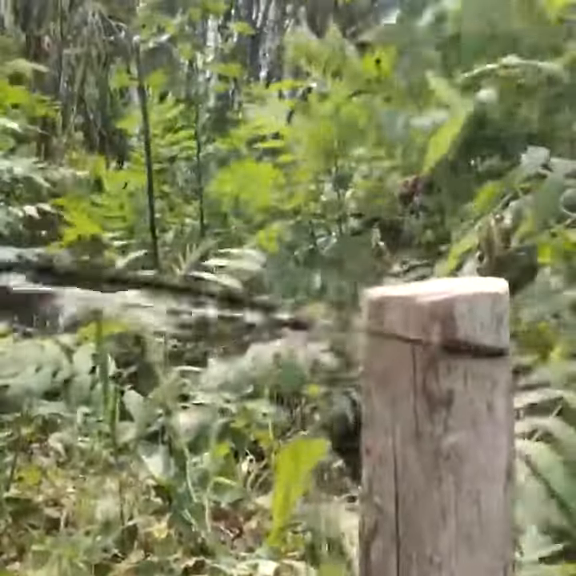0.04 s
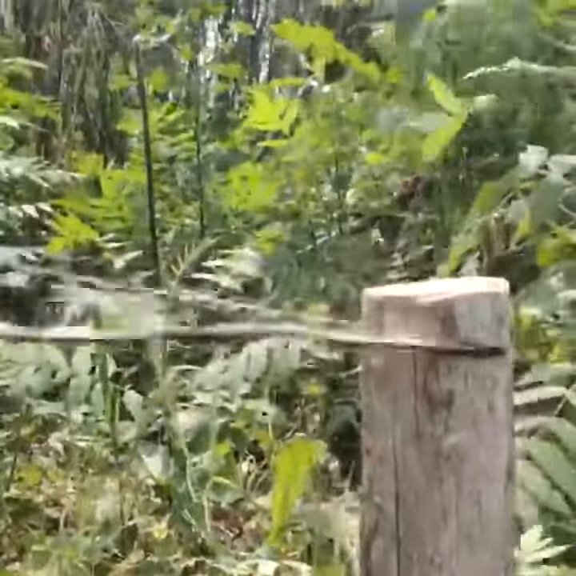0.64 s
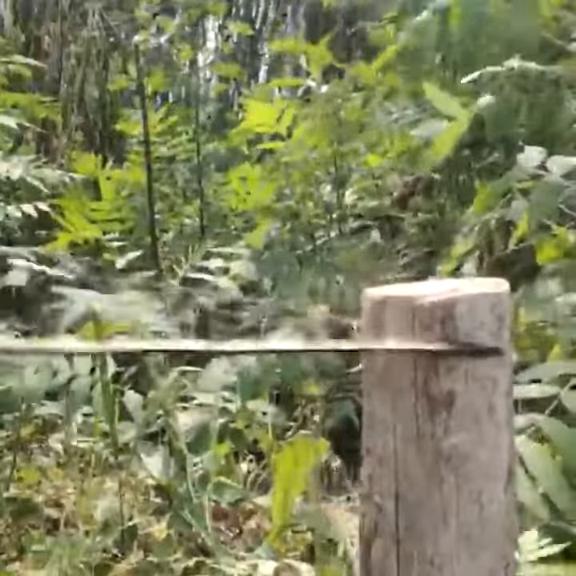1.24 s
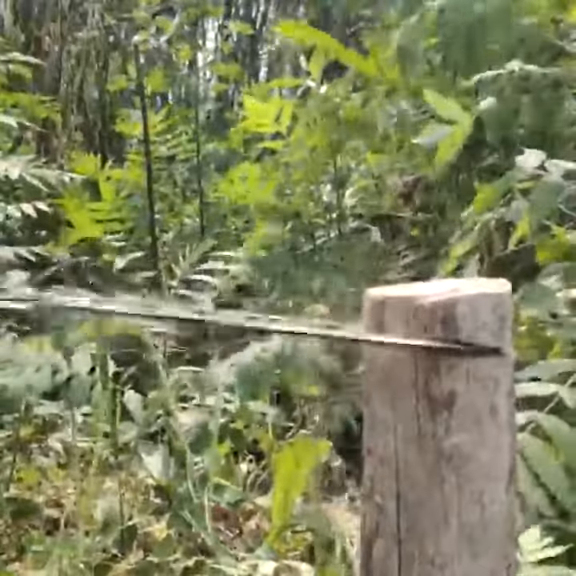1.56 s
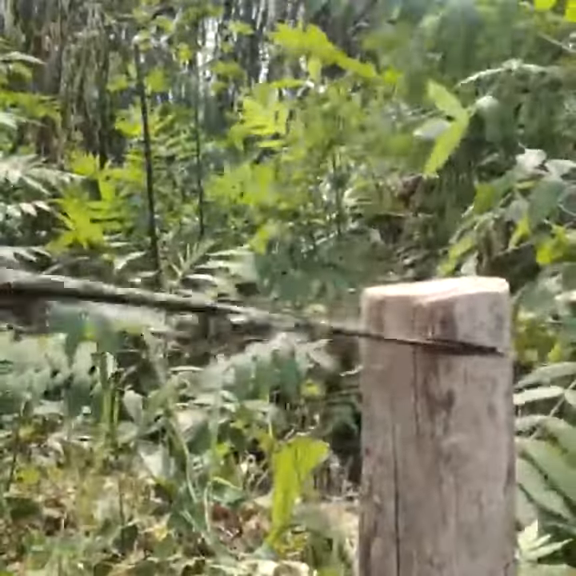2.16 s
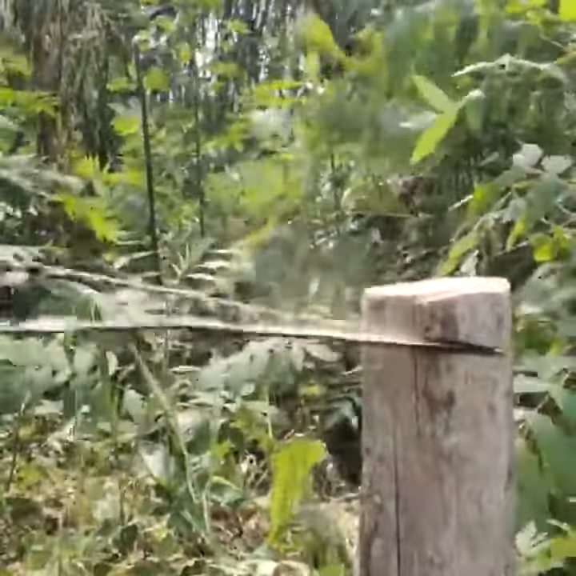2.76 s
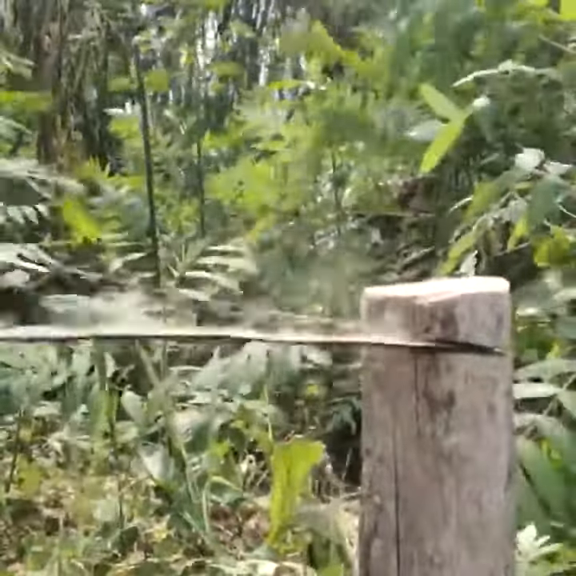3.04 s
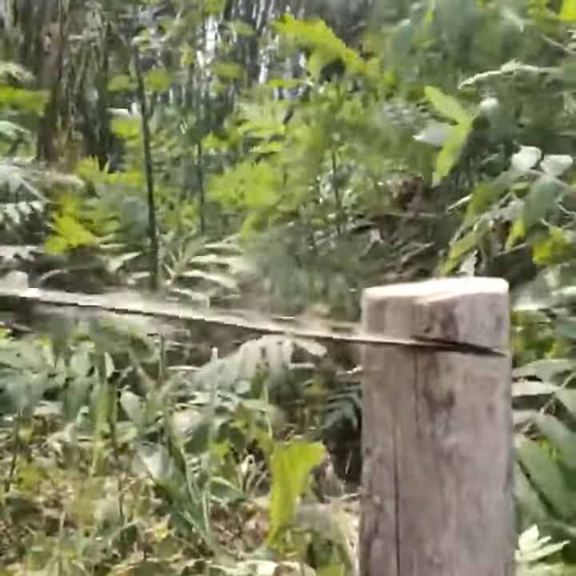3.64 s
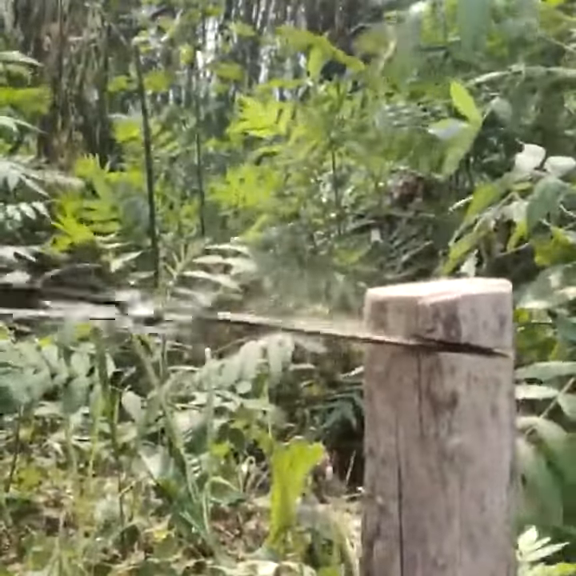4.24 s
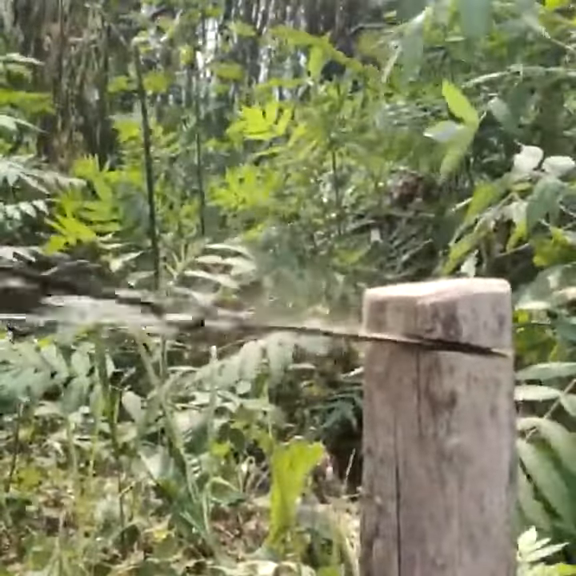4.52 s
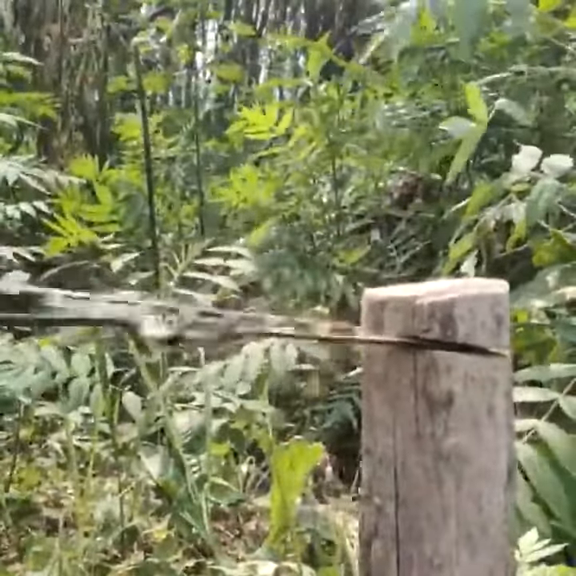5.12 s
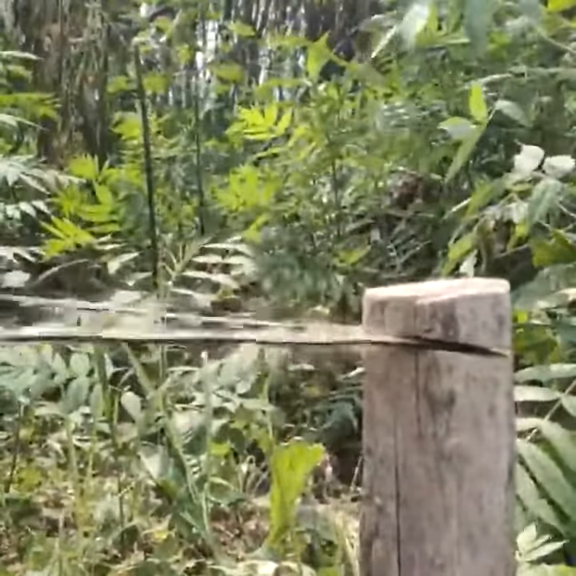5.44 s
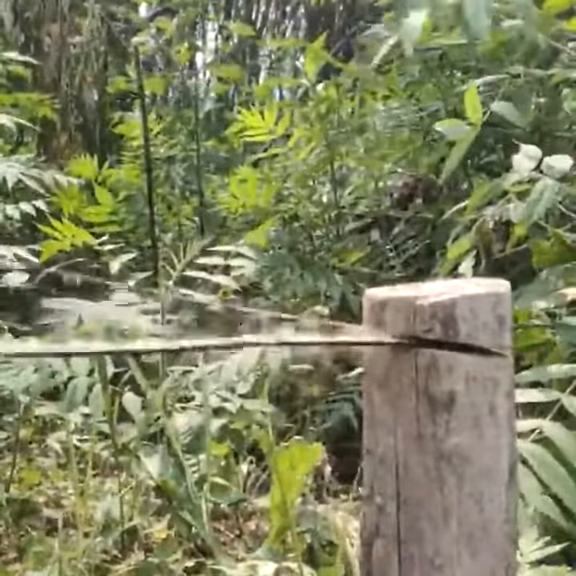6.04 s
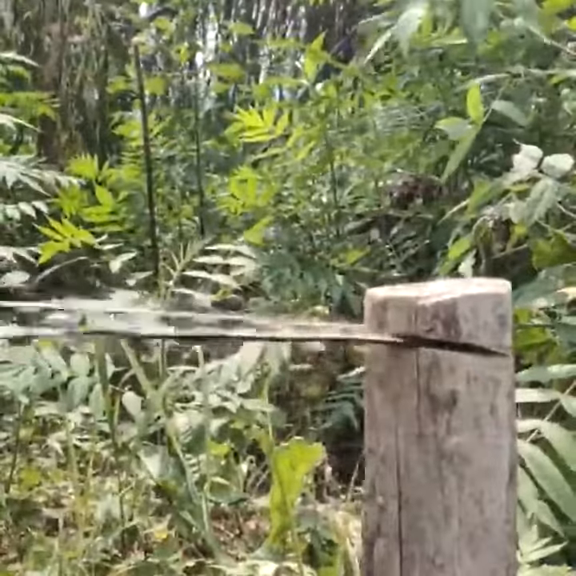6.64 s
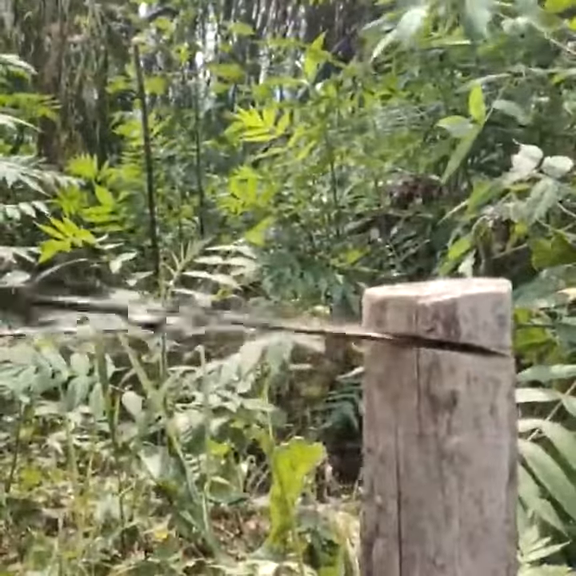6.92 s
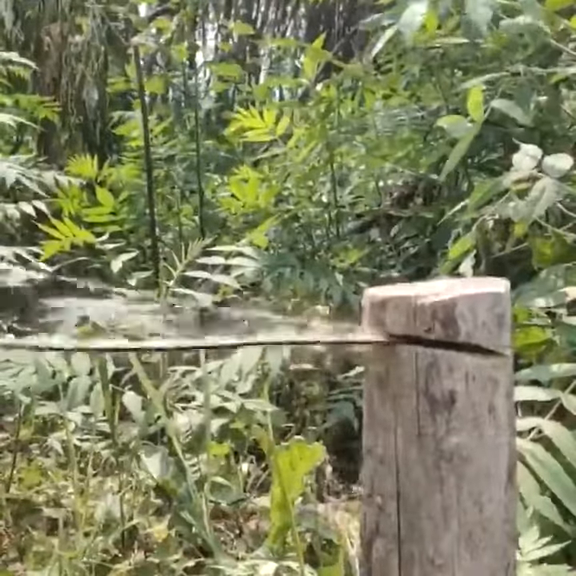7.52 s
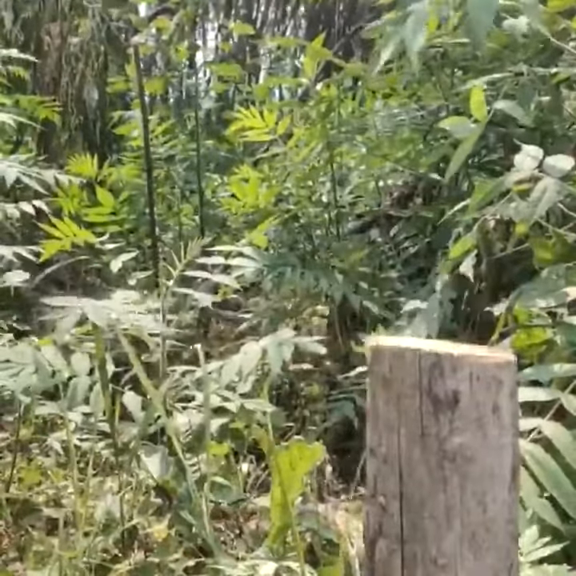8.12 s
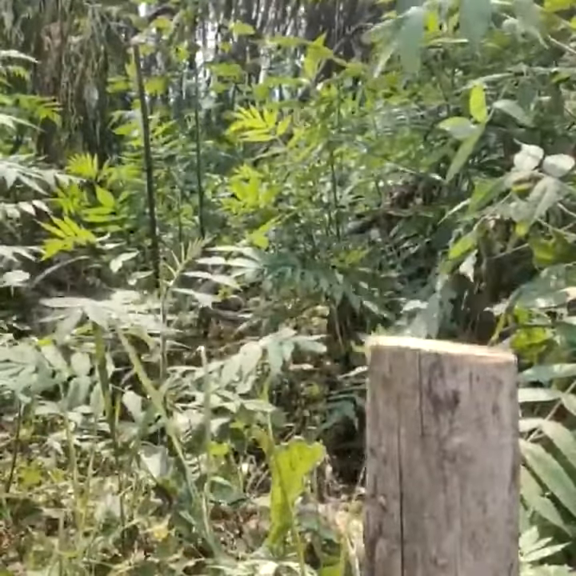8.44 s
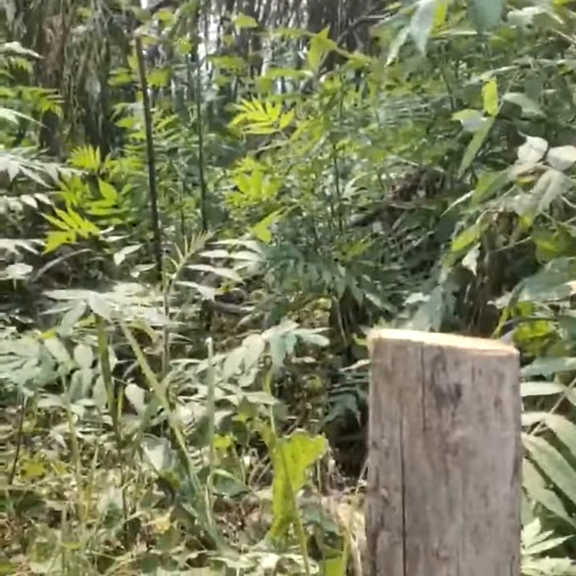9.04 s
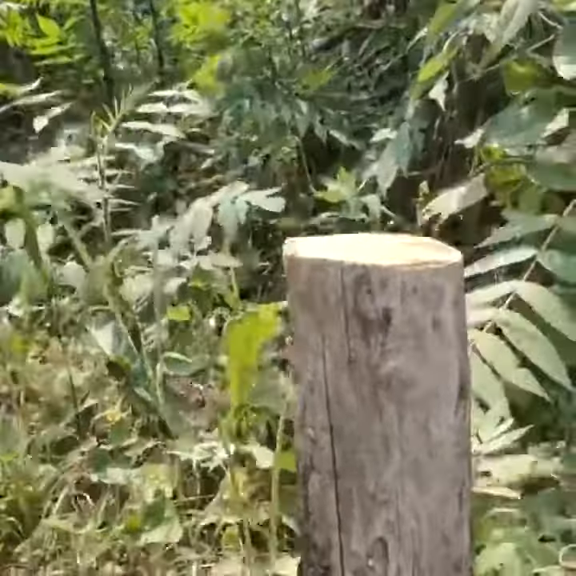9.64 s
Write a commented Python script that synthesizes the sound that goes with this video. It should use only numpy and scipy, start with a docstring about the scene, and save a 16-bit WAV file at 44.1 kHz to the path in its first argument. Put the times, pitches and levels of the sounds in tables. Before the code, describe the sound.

A hand chain saw rasps rapidly through a wooden post, links jingling, until the wood snaps and leaves rustle faintly.

```python
"""Hand chain saw through a post

A flexible chain saw is pulled left and right through a wooden post, nearly eight strokes a second.
Teeth tear the fibres, the post rings hollow and the steel links jingle, freer as the cut opens.
The last fibres snap and the top comes off. Then leaves rustle, twigs crack, a hand shifts with
soft thuds, and a far engine hums in the still forest air."""
import sys
import numpy as np
from scipy import signal
from scipy.fft import rfft, irfft, next_fast_len
from scipy.io import wavfile

SR = 44100
rng = np.random.default_rng(int(sys.argv[2]) if len(sys.argv) > 2 else 0)


def bounce(signal):
    """Save signal as a 16-bit WAV file at the path given by the first command-line argument."""
    frames = np.transpose(np.atleast_2d(signal))
    limited = np.clip(frames, -1, 1)
    pcm = np.round(limited * 32767).astype(np.int16)
    wavfile.write(sys.argv[1], SR, pcm)


N = 435266
T = np.arange(N) / SR

# Stereo image of the saw, the open air and close sounds: freq_hz, correlation
SAW_LIKENESS = [(60, .38), (150, .35), (210, .6), (270, .65), (370, .94), (550, .87), (1000, .9),
                (1250, .55), (1600, .35), (2100, .6), (2600, .7), (3200, .35), (4300, .05), (10000, .08)]
OPEN_LIKENESS = [(60, .8), (180, .65), (500, .9), (1000, .65), (2000, .35), (5000, .05), (10000, 0)]
NEAR_LIKENESS = [(60, .9), (10000, .85)]
# Lean of the saw and the open air: freq_hz, left_minus_right_db
SAW_BALANCE = [(60, 1.8), (210, 2.2), (400, .3), (800, 1.8), (1050, 1.3), (1300, 6), (1600, 1),
               (2100, -1.7), (3300, 2), (5500, .5), (7300, 0), (7850, 3), (8400, -2.5), (9600, -6)]
OPEN_BALANCE = [(60, .8), (180, 2), (500, .5), (2000, -.7), (7000, 0), (9500, -4)]

# Tone colours: freq_hz, gain_db
FOREST_TONE = [(20, -28.5), (50, -22.5), (100, -10), (180, 0), (380, -3.5), (875, -12.5), (1500, -14.5),
               (4600, -17.5), (7500, -18), (9700, -24.5)]  # still outdoor air
SWAY_TONE = [(30, -26), (70, -12.5), (105, -1), (125, 2.5), (170, -10), (400, -35.5)]  # the whole post rocking
THRUM_TONE = [(30, -32.5), (70, -27.5), (130, -18.5), (190, -1.5), (240, -0.5), (290, -3), (370, 0),
              (480, -12.5), (900, -37)]  # low body of the post
TOP_TONE = [(200, -28), (310, -9), (370, 0.5), (450, -2), (560, 1.5), (660, 1), (850, -16.5), (1500, -43)]  # its nearly severed top
POST_TONE = [(200, -37.5), (400, -6.5), (560, -1), (700, 1), (800, 0), (950, 1.5), (1080, 1.3),
             (1250, -1.5), (1500, -8), (2100, -20.5), (4000, -56)]  # its woody midrange
RASP_TONE = [(600, -32.5), (1200, -0.5), (1600, 0), (1950, 2), (2250, -.5), (2750, 0.5), (3200, -1.5),
             (3800, -1), (4400, -7.5), (5500, -7.5), (7000, -20), (8600, -20), (9300, -11), (10000, -18)]  # tearing fibres
JINGLE_TONE = [(3000, -36.5), (5000, -16), (6100, -16.5), (6500, -7), (7200, -5), (7500, 2), (7850, 3),
               (8120, 1.5), (8400, -7), (8900, -2.5), (9500, -4.5), (10500, -9)]  # high ring of steel links
LOOSE_TONE = [(1000, -24), (1300, -9), (1600, -22), (1880, -8), (2150, -18), (2640, -5.5), (3150, -14),
              (3630, -5.5), (3880, -17), (4200, -10), (4550, -8), (4850, -12), (5250, -1), (5600, 1),
              (5900, -5), (6150, -6), (6520, -3.5), (7000, -9), (7700, -16)]  # modes of links swinging free
JERK_TONE = [(60, -22), (130, -9), (220, 0), (400, -2), (900, -6), (1600, -13), (3500, -21), (7000, -40)]  # chain hitting wood
SNAG_TONE = [(200, -22), (900, 4), (2000, -6), (4500, 0), (5800, -3), (7800, 10), (10000, -15)]  # a tooth snapping free
FIBRE_TONE = [(300, -24), (900, -11), (2300, -12), (3200, -3), (4500, -1), (5500, 0), (6700, 2), (7900, 5),
              (9000, -4), (10000, -12)]  # a breaking fibre
LEAF_TONE = [(300, 12.5), (800, 14.5), (1600, 11.5), (3000, 9), (5000, -2), (8000, -30), (10000, -10)]  # brushed leaves
CRACKLE_TONE = [(500, -28), (1500, -4), (3000, -1), (5000, 5), (7500, 2), (9000, 2), (10000, -5)]  # dry leaves pressed hard
HAND_TONE = [(50, -13), (110, 2), (170, 6.5), (290, 6.5), (400, 1), (600, -3), (1200, -42.5)]  # dull handling noise
TWIG_TONE = [(200, -20), (800, 2), (1600, 1), (3000, 4), (4500, -1), (6500, 0), (8800, 5), (10000, -7)]  # a breaking twig

# One row a pull, the hands taking turns:
# start_s, length_s, force_db, swell_db, wood_db, wood_pitch_hz, links_db
STROKE_SCORE = [(0.012, 0.084, -0.4, 8, 2.0, 890, -4.1), (0.13, 0.108, -3.6, 1, -1.7, 990, -0.3),
                (0.279, 0.083, 0.0, 4, 0.5, 960, -3.8), (0.391, 0.107, -3.2, 5, -0.7, 970, 0.9),
                (0.534, 0.087, 0.4, 6, 2.2, 950, -5.9), (0.654, 0.105, -1.7, 6, -0.9, 980, 0.5),
                (0.806, 0.087, 0.7, 5, 2.3, 920, -4.6), (0.927, 0.1, -1.8, 4, 0.2, 930, 0.8),
                (1.07, 0.088, 0.6, 6, 1.1, 940, -3.6), (1.186, 0.1, -0.7, 3, -0.4, 960, 0.1),
                (1.324, 0.088, 0.1, 8, 1.0, 910, -4.2), (1.448, 0.101, -0.3, 3, 1.0, 970, -0.5),
                (1.585, 0.092, 0.9, 7, 1.1, 910, -3.4), (1.71, 0.105, -1.6, 4, -1.1, 950, 1.1),
                (1.862, 0.083, 1.9, 5, 2.7, 970, -2.2), (1.981, 0.096, -1.6, 5, 1.0, 850, -0.0),
                (2.115, 0.094, 1.4, 5, 0.5, 910, -5.3), (2.237, 0.103, -2.1, 2, 0.3, 990, -0.6),
                (2.386, 0.082, 0.8, 4, 1.9, 900, -4.0), (2.499, 0.084, 1.0, -2, 1.1, 850, 1.8),
                (2.618, 0.092, 1.3, 4, 1.2, 840, -3.0), (2.739, 0.11, -0.8, 2, 0.3, 850, 0.4),
                (2.89, 0.094, 0.7, 7, 1.4, 1020, -4.0), (3.012, 0.1, 0.2, 4, 0.5, 940, -0.1),
                (3.159, 0.09, 0.5, 7, -0.6, 780, -2.6), (3.275, 0.1, -0.9, 4, -0.9, 900, 0.4),
                (3.419, 0.096, 0.7, 3, -0.4, 900, -3.7), (3.546, 0.096, 1.6, 5, -0.6, 830, 3.9),
                (3.685, 0.098, 0.9, 4, -0.5, 780, -0.6), (3.81, 0.102, 0.7, 1, 0.9, 820, 4.5),
                (3.952, 0.094, 1.2, 2, 0.1, 890, -0.2), (4.08, 0.101, 3.0, 0, 2.8, 960, 4.2),
                (4.223, 0.094, 1.9, 1, -0.7, 910, 1.2), (4.352, 0.092, 3.3, 1, 0.6, 830, 5.0),
                (4.486, 0.099, -0.1, 3, -0.9, 920, 0.7), (4.624, 0.099, 1.1, 1, -0.4, 870, 4.3),
                (4.756, 0.107, 0.6, 3, -1.4, 880, -0.1), (4.889, 0.1, -0.1, 3, 0.6, 870, 1.3),
                (5.044, 0.096, 0.3, 3, 0.2, 900, 0.2), (5.171, 0.096, 0.5, 3, 0.9, 820, 3.9),
                (5.301, 0.109, -1.1, 4, -1.1, 920, -1.6), (5.437, 0.106, -1.8, 4, -0.7, 890, 1.7),
                (5.581, 0.1, 1.0, 2, 1.2, 950, 1.7), (5.708, 0.109, -0.4, 3, -1.3, 920, 3.4),
                (5.854, 0.105, -0.4, 7, -1.2, 1000, -0.2), (5.988, 0.105, -0.3, 4, -0.9, 800, 0.3),
                (6.123, 0.105, -0.3, 3, -0.3, 970, -0.2), (6.256, 0.104, -1.3, 0, -1.1, 860, -0.6),
                (6.385, 0.094, -0.6, 2, 0.8, 1040, -1.8), (6.511, 0.1, -1.7, -3, -0.7, 850, -2.2),
                (6.635, 0.104, -1.0, 4, 0.6, 990, -5.0), (6.761, 0.101, 0.8, 4, -0.2, 790, 0.6),
                (6.892, 0.097, -0.9, 3, -0.8, 960, -2.9), (7.013, 0.098, 1.3, -4, -0.3, 880, 1.4),
                (7.132, 0.105, -0.5, 1, -1.6, 960, 0.3), (7.263, 0.085, 2.1, -3, 1.5, 710, 5.5),
                (7.371, 0.1, 0.1, -2, 0.4, 890, 5.7), (7.5, 0.076, 1.3, -7, -0.1, 880, 5.8),
                (7.599, 0.086, 0.3, -6, -2.0, 930, 1.7), (7.706, 0.084, -1.0, -2, -3.4, 870, 3.7),
                (7.814, 0.094, -1.9, -1, -2.8, 820, 1.4), (7.926, 0.081, -0.8, 1, -3.1, 900, 3.1)]
START_S, LENGTH_S, FORCE_DB, SWELL_DB, WOOD_DB, WOOD_HZ, LINKS_DB = np.transpose(STROKE_SCORE)
# As the cut deepens the top flaps more and the post sways less:
# time_s, post_db, rasp_db, top_db, sway_db
CUT_DEPTH = [(0, -30.1, -31, -44, -53), (2.7, -30.5, -30.7, -41, -54), (3.5, -30.9, -30.8, -36, -57),
             (4.3, -30.8, -30.6, -36.5, -60), (5.6, -30.3, -31.1, -38.5, -59),
             (6.6, -30.3, -30.9, -36.5, -65), (7.45, -31, -31.5, -34.5, -62),
             (7.95, -31.6, -33.4, -35, -55)]
# Fader ride of the low thrum: time_s, level_db
THRUM_RIDE = [(0, -41.5), (2.3, -39.5), (3.3, -39.5), (4.1, -42), (5.9, -42.5), (6.8, -40.5), (7.3, -43),
              (7.95, -39.5)]
# The lower link modes ring once the cut stops gripping: time_s, relative_to_jingle_db
LINK_FREEDOM = [(0, -35), (3.3, -13), (4.2, -24), (6.8, -9), (7.25, -8.5), (7.7, -4.5), (7.81, 1.5),
                (8.02, -1.5)]

# Cues for single hits: time_s, level_db
JERK_CUES = [(1.872, -25), (2.137, -23), (2.492, -21.5), (3.549, -19.5), (4.092, -19), (4.2250, -17.5),
             (4.362, -19), (4.895, -22), (5.449, -24), (5.722, -19), (6.001, -20), (6.515, -24),
             (6.649, -23), (7.5065, -16), (7.5112, -16), (7.944, -19.5), (7.997, -23), (8.04, -24.5)]  # the chain comes taut hard
KNOCK_CUES = [(.377, -26), (.900, -29.5), (2.366, -26), (2.376, -25), (8.045, -31)]  # a hand knocks softly between pulls; the top thumps as it comes off
SNAG_CUES = [(2.4952, -17), (3.5488, -18), (3.8232, -17), (4.3565, -12), (4.3685, -10), (4.5580, -14),
             (4.6222, -13.5), (4.6802, -14), (4.9077, -17), (5.0625, -22), (5.7369, -17), (6.7615, -21),
             (7.0145, -17), (7.152, -14), (7.2644, -16), (7.5065, -13), (7.6011, -15), (7.7074, -18),
             (7.8240, -17)]  # a tooth catches
BREAK_CUES = [(7.4910, -5.3), (7.6288, -6.8)]  # the last fibres give
TWIG_CUES = [(8.512, -29), (8.6240, -27), (8.9485, -24.5), (9.0090, -32), (9.0200, -31), (9.0258, -21),
             (9.7945, -36)]  # twigs crack
THUD_CUES = [(9.185, -35), (9.283, -33), (9.350, -33), (9.378, -33), (9.400, -33), (9.627, -29)]  # the hand bumps
# Cues for soft swells: middle_s, half_width_s, level_db
RUSTLE_CUES = [(8.25, .04, -53), (8.38, .04, -55), (8.6, .09, -55), (8.93, .05, -51), (9.005, .028, -47.5),
               (9.08, .06, -50.5), (9.26, .03, -51), (9.39, .035, -51), (9.58, .03, -48)]  # leaves brush past
SHIFT_CUES = [(8.38, .03, -49), (8.93, .07, -50), (9.1, .07, -50), (9.35, .09, -53), (9.615, .035, -44),
              (9.8, .04, -50)]  # the hand shifts
# The far engine rising and sinking: time_s, pitch_hz, level_db
ENGINE_RIDE = [(8.25, 94, -78), (8.42, 98, -53), (8.62, 99, -48), (8.85, 92, -51), (9.05, 87, -64),
               (9.25, 84, -72), (9.55, 95, -69), (9.72, 99, -44), (9.87, 97, -50)]
# Its harmonics: multiple, gain_db
ENGINE_HARMONICS = [(1, 1), (2, -9.5), (3, -7.5)]

# Stroke envelopes: arch_db, slack_db, attack_s, release_s
PULL = (5.9, -11, .014, .009)  # teeth bite, gather speed to mid-stroke and let go
TENSION = (1.4, -11, .008, .013)  # the taut chain shakes the post evenly
DEEP_BITE = (7.4, -13, .02, .006)  # the post rings only while the teeth bite deep
# The freed chain jingles, rings and grazes the post: start_s, length_s, level_db, swell_db
SLIP_JINGLE, SLIP_RING, SLIP_GRAZE = (8.014, .055, -32.5, 4), (8.014, .055, -34.5, 3), (8.025, .035, -41, 0)
LEAD_S, TRAIL_S = .02, .022  # the slack chain slides before and after each pull


def gain_of(db):
    """Decibels to amplitude."""
    return 10 ** (np.asarray(db) / 20)


def evened(x):
    """Scales a stereo pair so that its mid has rms 1."""
    return x / np.sqrt(np.mean(x.mean(0) ** 2) + 1e-20)


def read(points, hz):
    """Reads a spectrum on a log-frequency axis."""
    freq_hz, value = np.transpose(points)
    return np.interp(np.log(hz + 1), np.log(np.sort(freq_hz) + 1), value)


def follow(curve, at_s):
    """Reads every column of a curve at the given times."""
    times, *columns = np.transpose(curve)
    return [np.interp(at_s, times, column) for column in columns]


def colour(x, tone, size=2048):
    """Rings x through a minimum-phase body with this tone."""
    log_gain = np.log(gain_of(read(tone, abs(np.fft.fftfreq(size, 1 / SR)))))
    ring = np.fft.ifft(np.exp(np.conj(signal.hilbert(log_gain)))).real
    return signal.oaconvolve(x, ring[None], axes=1)[:, :x.shape[1]]


def spread(x, likeness, balance):
    """Blends two signals into a stereo image, with width and lean set by frequency."""
    size = next_fast_len(x.shape[1], True)
    left, other = rfft(x, size)
    hz = np.fft.rfftfreq(size, 1 / SR)
    same = np.clip(read(likeness, hz), -.99, .99)
    lean = gain_of(read(balance, hz) / 2)
    right = same * left + np.sqrt(1 - same ** 2) * other
    return irfft([left * lean, right / lean], size)[:, :x.shape[1]]


def grains(per_s, size_db, decay_s, steady):
    """Grain envelope: sudden breaks of uneven size, each dying fast, over steady sliding."""
    sizes = gain_of(size_db * np.minimum(rng.exponential(1, N), 4))
    breaks = sizes * (rng.random(N) < per_s / SR)
    power = signal.lfilter([1], [1, -np.exp(-2 / (decay_s * SR))], breaks ** 2)
    return np.sqrt(power / power.mean() + steady)


def air(tone, grain=1):
    """Coloured noise from all around, its mid at rms 1."""
    noise = spread(grain * rng.standard_normal((2, N)), OPEN_LIKENESS, OPEN_BALANCE)
    return evened(colour(noise, tone))


def scrape(tone, grain):
    """Noise at the cut, broken into grains before it meets the body."""
    return colour(spread(grain * rng.standard_normal((2, N)), SAW_LIKENESS, SAW_BALANCE), tone)


def resonate(x, hz, width_hz):
    """A resonance that follows the curve hz."""
    turn = np.exp(2j * np.pi * np.cumsum(hz) / SR)
    pole = np.exp(-np.pi * width_hz / SR)
    return 2 * (turn * signal.sosfilt([[1 - pole, 0, 0, 1, -pole, 0]] * 2, x / turn)).real


def ripple(x, depth_db, spacing_hz=140):
    """As the chain runs through the cut, one random set of peaks and hollows fades into another."""
    length = x.shape[1]
    size = next_fast_len(length, True)
    hz, knots = np.fft.rfftfreq(size, 1 / SR), np.arange(0, SR / 2, spacing_hz)
    shapes = np.tanh(rng.standard_normal((2, len(knots))))
    gains = [gain_of(depth_db * np.interp(hz, knots, shape)) for shape in shapes]
    early, late = (evened(irfft(rfft(x, size) * gain, size)[:, :length]) for gain in gains)
    fade = np.pi / 2 * np.clip(np.linspace(-1, 2, length), 0, 1)
    return np.cos(fade) ** 2 * early + np.sin(fade) ** 2 * late


def strokes(level_db, swell_db, hand_db=0):
    """One layer's rows for pulls(), the first hand hand_db softer and the second that much louder."""
    hand = (-1) ** (np.arange(len(START_S)) + 1)
    return list(zip(START_S, LENGTH_S, level_db + hand * hand_db, swell_db * np.ones(len(hand))))


def pulls(x, rows, envelope, ring_s, ring_db, detune=0, ripple_db=0):
    """Plays x stroke by stroke; each lays other links in the cut and gets fresh short resonances."""
    arch_db, slack_db, attack_s, release_s = envelope
    out, lag_s = np.zeros((2, N)), np.arange(2048) / SR
    for start, length, level_db, swell_db in rows:
        at = np.arange(max(round((start - LEAD_S) * SR), 0), round((start + length + TRAIL_S) * SR))
        pitch = 1 + detune * rng.standard_normal()  # no two links are tuned quite alike
        piece = x[:, at[0]:][:, :round(len(at) * pitch)]
        if detune:
            piece = signal.resample(piece, len(at), axis=1)
        if ripple_db:
            piece = ripple(piece, ripple_db)
        tail = rng.standard_normal(len(lag_s)) * np.exp(-lag_s / ring_s)
        ring = (lag_s == 0) + gain_of(ring_db) * tail / np.linalg.norm(tail)
        sound = evened(signal.fftconvolve(piece, ring[None], axes=1)[:, :len(at)])
        t = at / SR - start
        along = np.clip(t / length, 0, 1) - .5  # zero at mid-stroke
        attack = np.clip(t / attack_s + .5, gain_of(slack_db), 1)
        release = np.exp(-np.maximum((t - length) / release_s + .5, 0))
        force = gain_of(level_db - arch_db * (2 * along) ** 2 + swell_db * along)
        out[:, at] += sound * attack * force * release * signal.windows.tukey(len(at), .05)
    return out


def hits(cues, tone, decay_s, splinter, likeness=SAW_LIKENESS):
    """Single blows: a sharp push and a short burst of splintering, coloured by what is struck."""
    t, out = np.arange(SR // 20) / SR, np.zeros((2, N))
    push = np.array([[1], [.6]]) * (t == 0)
    for time_s, level_db in cues:
        burst = splinter * rng.standard_normal((2, len(t))) * np.exp(-t / decay_s)
        blow = colour(push + burst, tone)
        slot = out[:, round(time_s * SR):][:, :len(t)]
        slot += gain_of(level_db) * blow[:, :slot.shape[1]] / abs(blow).max()
    return spread(out, likeness, SAW_BALANCE)


def swells(cues, rest_db):
    """Bell-shaped swells over a resting level, faded in as the sawing ends."""
    power = sum(gain_of(db) ** 2 * np.exp(-((T - s) / width) ** 2) for s, width, db in cues)
    fade_in = np.clip((T - 8.03) / .056, 0, 1)
    return fade_in * np.sqrt(power + gain_of(rest_db) ** 2)


def forest_air():
    """A soft bed of outdoor air under the whole scene."""
    return gain_of(-46.5) * air(FOREST_TONE)


def post_shake(teeth, sway_db, top_db):
    """The low end: the taut chain sways the post, sets it thrumming and flaps its top."""
    thrum_db, = follow(THRUM_RIDE, START_S)
    sway_rows = strokes(sway_db + .6 * FORCE_DB, swell_db=-1.5, hand_db=-.5)
    thrum_rows = strokes(thrum_db + .6 * FORCE_DB, swell_db=-1.2, hand_db=2.5)
    top_rows = strokes(top_db + .7 * FORCE_DB, .9 * SWELL_DB, hand_db=-.3)
    sway = pulls(scrape(SWAY_TONE, teeth), sway_rows, TENSION, ring_s=.012, ring_db=-4.5)
    thrum = pulls(scrape(THRUM_TONE, teeth), thrum_rows, TENSION, ring_s=.0068, ring_db=-5)
    top = pulls(scrape(TOP_TONE, teeth), top_rows, PULL, ring_s=.0078, ring_db=-4.5)
    return sway + thrum + top


def post_ring(teeth, post_db):
    """Deep bites ring the wood, its hollow main resonance at a new pitch for each pull."""
    wood_rows = strokes(post_db + 1.1 * WOOD_DB, 1.15 * SWELL_DB)
    wood = pulls(scrape(POST_TONE, teeth), wood_rows, DEEP_BITE, ring_s=.0048, ring_db=-6)
    stroke_now = np.maximum(np.searchsorted(START_S - LEAD_S, T) - 1, 0)
    hollow = resonate(scrape(POST_TONE, teeth ** 1.3), WOOD_HZ[stroke_now], width_hz=380)
    hollow_rows = strokes(-36.8 + 1.4 * WOOD_DB, 1.15 * SWELL_DB)
    return wood + pulls(hollow, hollow_rows, DEEP_BITE, ring_s=.004, ring_db=-12)


def fibre_rasp(teeth, rasp_db):
    """Teeth tear the fibres, louder the harder the pull."""
    rows = strokes(rasp_db + FORCE_DB, .8 * SWELL_DB)
    return pulls(scrape(RASP_TONE, teeth + .15), rows, PULL, ring_s=.0095, ring_db=-6, ripple_db=4.5)


def link_jingle(teeth):
    """Steel links jingle as they run clear of the wood; lower modes join as the cut lets go."""
    jingle_db = -30.7 + 1.05 * LINKS_DB
    free_db, = follow(LINK_FREEDOM, START_S)
    jingle_rows = strokes(jingle_db, .45 * SWELL_DB) + [SLIP_JINGLE]
    loose_rows = strokes(jingle_db + free_db, .45 * SWELL_DB, hand_db=-.8) + [SLIP_RING]
    jingle = pulls(scrape(JINGLE_TONE, teeth ** 1.2), jingle_rows, PULL,
                   ring_s=.0077, ring_db=1.5, detune=.009, ripple_db=8)
    loose = pulls(scrape(LOOSE_TONE, teeth ** 1.3), loose_rows, PULL,
                  ring_s=.0064, ring_db=0, detune=.008, ripple_db=4.5)
    return jingle + loose


def chain_jerks():
    """The chain comes taut against the post: a light tug on every pull, a hard jerk on some."""
    tug_db = FORCE_DB - 36 + 3 * rng.standard_normal(len(START_S))
    tugs = list(zip(START_S + .008, tug_db))
    return gain_of(2.2) * hits(JERK_CUES + tugs, JERK_TONE, decay_s=.0029, splinter=.13)


def soft_knocks():
    """A hand knocks softly between a few pulls, the post ringing low, and the top thumps once as it comes off."""
    return hits(KNOCK_CUES, THRUM_TONE, decay_s=.008, splinter=.17)


def tooth_snags():
    """A tooth catches and snaps free with a bright click."""
    return gain_of(.5) * hits(SNAG_CUES, SNAG_TONE, decay_s=.0017, splinter=.6)


def fibre_breaks():
    """The last fibres holding the top break, sharp and close."""
    return hits(BREAK_CUES, FIBRE_TONE, decay_s=.0016, splinter=1.5, likeness=NEAR_LIKENESS)


def chain_graze(teeth):
    """The freed chain grazes the post on its way out."""
    return pulls(scrape(POST_TONE, teeth), [SLIP_GRAZE], PULL, ring_s=.0048, ring_db=-6)


def leaves():
    """Dry leaves brush past; under pressure their crackle grows faster than their rustle."""
    brush = swells(RUSTLE_CUES, rest_db=-60)
    rustle = air(LEAF_TONE, grains(per_s=1200, size_db=3.5, decay_s=.001, steady=.6))
    crackle = air(CRACKLE_TONE, grains(per_s=600, size_db=2.6, decay_s=.0008, steady=.4))
    return rustle * brush + gain_of(-45.5) * crackle * (brush / brush.max()) ** 2


def handling():
    """A shifting hand rubs dully and lands a few soft thuds."""
    rub = air(HAND_TONE) * swells(SHIFT_CUES, rest_db=-61)
    return rub + hits(THUD_CUES, HAND_TONE, decay_s=.008, splinter=.17)


def far_engine():
    """A distant engine hums in three harmonics, swelling as its pitch rises."""
    pitch_hz, level_db = follow(ENGINE_RIDE, T)
    turns = np.cumsum(pitch_hz) / SR
    hum = sum(gain_of(db) * np.sin(2 * np.pi * k * turns) for k, db in ENGINE_HARMONICS)
    return np.sqrt(2) * gain_of(level_db - 4.5) * hum


def twigs():
    """Twigs break with small dry cracks."""
    return hits(TWIG_CUES, TWIG_TONE, decay_s=.0026, splinter=.4)


def scene():
    """The same tooth bites drive post, fibres and chain; then the quiet forest is left."""
    teeth = grains(per_s=500, size_db=2, decay_s=.001, steady=1)
    post_db, rasp_db, top_db, sway_db = follow(CUT_DEPTH, START_S)
    wood = post_shake(teeth, sway_db, top_db) + post_ring(teeth, post_db) + fibre_rasp(teeth, rasp_db)
    chain = link_jingle(teeth) + chain_jerks() + chain_graze(teeth)
    accents = soft_knocks() + tooth_snags() + fibre_breaks()
    return forest_air() + wood + chain + accents + leaves() + handling() + far_engine() + twigs()


def record(dry):
    """A steep low-pass takes off the top end."""
    low_pass = signal.firwin(601, 9750, window=("kaiser", 8), fs=SR)
    return signal.oaconvolve(dry, low_pass[None], "same", axes=1)


dry = scene()
out = record(dry)
bounce(out)
```